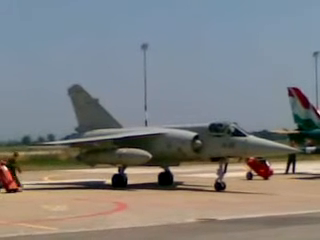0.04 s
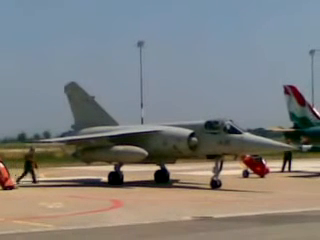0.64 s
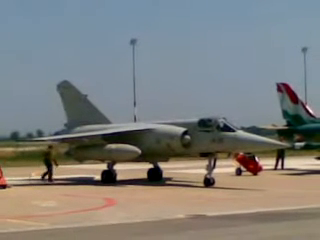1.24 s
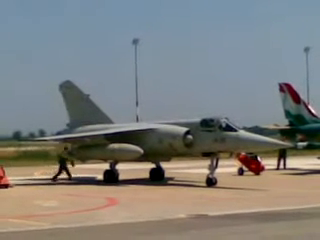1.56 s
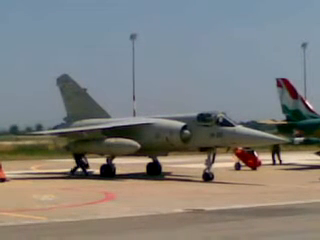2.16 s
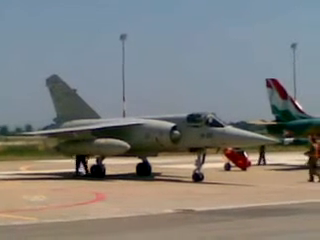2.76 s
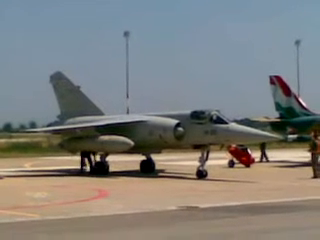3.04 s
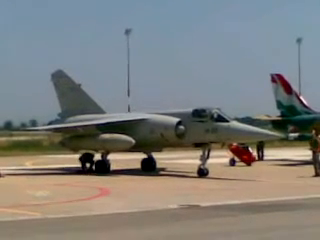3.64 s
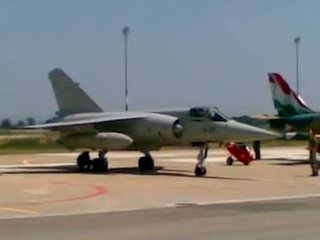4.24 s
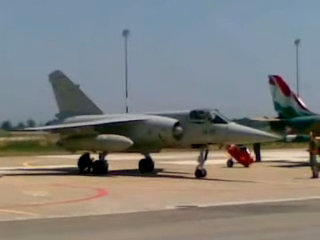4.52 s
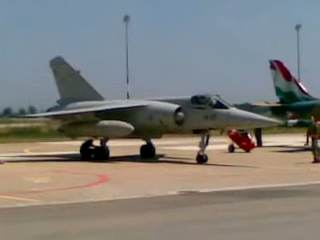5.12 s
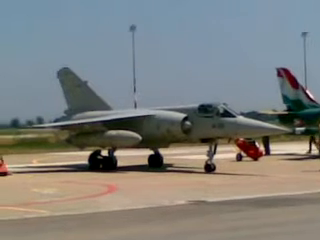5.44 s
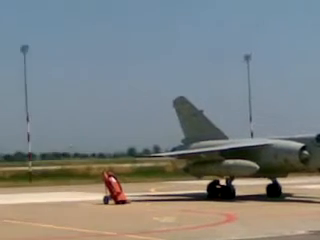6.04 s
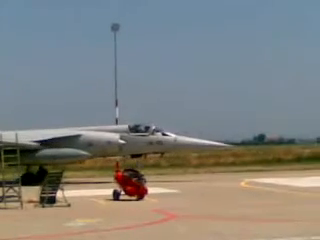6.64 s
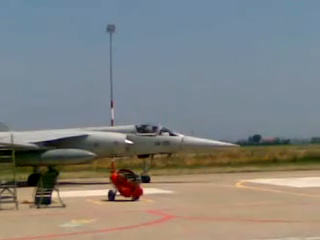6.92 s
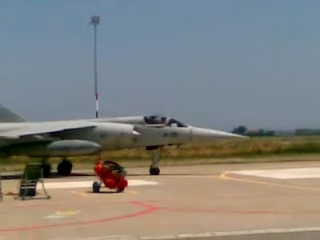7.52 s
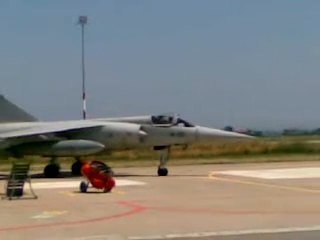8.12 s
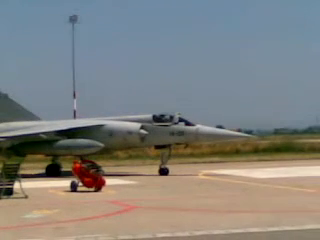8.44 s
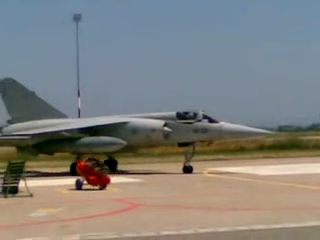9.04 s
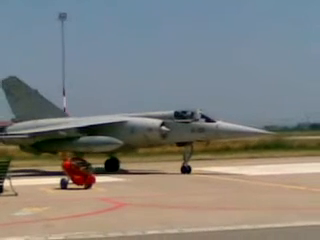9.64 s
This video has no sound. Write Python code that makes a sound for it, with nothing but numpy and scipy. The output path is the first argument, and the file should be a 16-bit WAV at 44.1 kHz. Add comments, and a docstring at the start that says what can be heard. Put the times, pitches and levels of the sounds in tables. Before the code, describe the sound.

A fighter jet's engine idles steadily outdoors on an airbase apron, some tens of metres from the microphone. Its piercing, many-toned whine wavers over intake rush, hiss and a billowing rumble. After about six seconds everything stops for a split second. The same noise resumes from another spot, now with a second jet whining slightly higher alongside, and runs to the end.

```python
"""Two turbojet fighters idle on an open apron, some tens of metres away, one spool a little faster.
Their compressors whine in thin blade tones standing on three humps of intake noise, over rushing air,
bright hiss and exhaust roar. Hot, moving air makes every part swell and fade. The sound stops for an
instant and resumes from a second standpoint, where the other jet's tones join the main jet's."""
import sys
import numpy as np
from scipy import signal
from scipy.fft import rfft, irfft, next_fast_len
from scipy.io import wavfile

SR = 44100
rng = np.random.default_rng(int(sys.argv[2]) if len(sys.argv) > 2 else 0)


def waveform_to_disk(signal):
    """Save audio, clipped to [-1, 1], as 16-bit WAV at the path in sys.argv[1]."""
    frames = np.transpose(np.atleast_2d(signal))
    scaled = np.clip(frames, -1, 1) * 32767
    samples = np.round(scaled).astype(np.int16)
    wavfile.write(sys.argv[1], SR, samples)


N = 435266
TIME = np.arange(N) / SR
FFT_SIZE = next_fast_len(N)
HZ = np.maximum(np.arange(FFT_SIZE // 2 + 1) * SR / FFT_SIZE, 1)


def from_db(db):
    """Decibels to gain."""
    return 10 ** (np.asarray(db) / 20)


def bell(middle_s, length_s):
    """A smooth rise to 1 and fall, above half for length_s."""
    return .5 + .5 * np.cos(np.pi * np.clip((TIME - middle_s) / length_s, -1, 1))


def drift(rate):
    """Smooth random modulation with spread 1, changing about rate times a second."""
    pole = np.exp(-80 * np.pi * rate / SR)  # one step every 40 samples
    steps = rng.standard_normal(N // 40 + 2002)
    slow = signal.lfilter([1], [1, -2 * pole, pole * pole], steps)[2000:]
    return np.interp(np.arange(N) / 40, np.arange(len(slow)), slow / slow.std())


def noise(density_db):
    """Noise with the given dB per Hz at every frequency."""
    white = rfft(rng.standard_normal(FFT_SIZE))
    return irfft(white * from_db(density_db), FFT_SIZE)[:N] * np.sqrt(SR / 2)


def noise_bed(spectrum, edge_db=36):
    """Noise shaped by an EQ curve, falling by edge_db an octave beyond its ends."""
    hz, db = np.transpose(spectrum)
    octaves_outside = np.abs(np.log2(HZ / np.clip(HZ, hz[0], hz[-1])))
    return noise(np.interp(np.log(HZ), np.log(hz), db) - edge_db * octaves_outside)


def two_band_gain(x, split_hz, below, above):
    """One gain below a crossover, another above it."""
    low = signal.sosfiltfilt(signal.butter(2, split_hz, fs=SR, output="sos"), x)
    return low * below + (x - low) * above


def moving_air(reach_octaves=0.12):
    """Hot, moving air tilts the spectrum and swells narrow bands. Returns air(hz), a gain over time."""
    # treble ride: t/s, level/dB
    treble = [(0.0, -0.5), (0.9, -0.7), (1.05, -2), (1.65, -1.5), (1.95, -0.6), (2.85, 0.5), (3.15, 1.5),
              (3.9, -1.3), (4.2, 1), (6.0, 0.6), (6.3, -2.1), (7.2, 0.7), (7.35, -0.16), (9.87, 0.6)]
    # as the treble rises the low whine recedes: f/Hz, level/dB per dB of treble
    tilt = [(1000, 0.5), (1800, -0.9), (2550, .35), (3600, 0.1), (5450, 1.3), (7500, 1.1), (11000, 1.4)]
    # one band briefly swells or fades: middle t/s, length/s, f/Hz, level/dB
    swells = [(0.2, .9, 1250, 2), (0.5, .9, 5500, -0.7), (0.6, 0.93, 3830, 4), (1.248, 0.13, 5500, 3.5),
              (1.552, .6, 2550, -2), (1.98, 0.29, 1790, 2), (3.0, 1.0, 3700, -1.8), (3.5, 0.53, 2530, -1),
              (3.65, 0.74, 1800, -2.2), (4.647, .45, 1820, 2.5), (5.3, 1.0, 1400, 0),
              (6.554, 1.4, 3650, -2), (6.9, 1.3, 5500, -0.5), (8.05, .4, 3600, 2), (8.2, 0.53, 5400, 2),
              (8.747, 0.18, 3800, 4), (8.8, 0.22, 2550, 2.5), (9.054, 0.24, 5500, -2), (9.3, .45, 1800, 1),
              (9.75, 0.2, 3620, 2.5), (9.8, 0.38, 1250, 4.5)]
    treble_db = np.interp(TIME, *np.transpose(treble))
    tilt_hz, follows = np.transpose(tilt)
    swell_hz = np.array([hz for _, _, hz, _ in swells])
    swell_db = np.array([db * bell(s, length) for s, length, _, db in swells])

    def air(hz):
        tilt_db = np.interp(np.log(hz), np.log(tilt_hz), follows) * treble_db
        nearness = np.exp(-(np.log2(hz / swell_hz) / reach_octaves) ** 2)
        return from_db(tilt_db + nearness @ swell_db)
    return air


def blade_tone(hz, spool_time):
    """A steady tone plus a part scattered by eddies; higher tones scatter more and flutter faster."""
    height = hz / 2000
    scattered = from_db(-6.5) * np.sqrt(height)
    flutter_rate = 3.04 * height
    phase = 2 * np.pi * (hz * spool_time + rng.random())
    in_phase = np.sqrt(2) + scattered * drift(flutter_rate)
    quadrature = scattered * drift(flutter_rate)
    return (in_phase * np.cos(phase) + quadrature * np.sin(phase)) / np.sqrt(1 + scattered ** 2)


def compressor_whine(tones, air, sag=0, wander_share=0.0002004, swell_depth=1.4):
    """Blade tones locked to one spool's wandering idle speed; they swell more deeply than the noise."""
    speed = 1 + wander_share * drift(.4) - sag
    spool_time = np.cumsum(speed) / SR
    return sum(gain * blade_tone(hz, spool_time) * air(hz) ** swell_depth for hz, gain in tones)


def main_jet_whine(first, second, air, sag_share=0.002786):
    """The main jet's compressor, heard from both standpoints; its spool speed sags once."""
    # blade tones: f/Hz, level/dB at the first standpoint, level/dB at the second
    blade_tones = [(1701, -39.3, -37.9), (1749, -44, -38.5), (1768, -31.9, -30.3), (1816, -45, -38.5),
                   (1863, -35.1, -31.2), (1978, -43.5, -45.2), (2007, -45.9, -43.9), (2098, -42.5, -46),
                   (2130, -44, -43.5), (2532, -39.3, -37.5), (3009, -45.0, -46.6), (3350, -41.0, -42.1),
                   (3520, -32.6, -34.7), (3679, -37.9, -40.8), (3726, -32.7, -32.5), (5305, -42.5, -45.1),
                   (5447, -27.9, -30.8), (5592, -35.8, -35.7)]
    tones = [(hz, first * from_db(db_1) + second * from_db(db_2)) for hz, db_1, db_2 in blade_tones]
    sag = sag_share * bell(middle_s=3.55, length_s=0.906)
    return from_db(0.5) * compressor_whine(tones, air, sag - sag.mean())


def intake_humps(standpoint, air, flicker_db=0.7):
    """Blades chop turbulent inflow into three humps of noise. Returns the sound and each one's air gain."""
    # humps at each standpoint: centre f/Hz, half-power width/Hz, level/dB per Hz
    humps_first = [(1687, 175, -52.5), (3490, 248, -48.5), (5510, 193, -47.5)]
    humps_second = [(1800, 194, -53.5), (3600, 213, -47), (5540, 175, -47)]
    sound, gains = 0, []
    for hz, width, db in (humps_first, humps_second)[standpoint]:
        shape_db = db - 20 * np.log10(2) * abs(HZ - hz) / width
        gain = air(hz)
        sound += noise(shape_db) * gain * from_db(flicker_db * drift(10))
        gains.append(gain)
    return sound, gains


def intake_rush(standpoint, air, hump_gains):
    """Air rushes into the intakes, swelling along with the humps and hiss around it."""
    # rush spectrum at each standpoint: f/Hz, level/dB per Hz
    rush_first = [(1000, -67.5), (1500, -62.5), (2330, -57), (2450, -64.5), (2650, -60), (3200, -62),
                  (4400, -65), (4700, -59), (6200, -60)]
    rush_second = [(1000, -64.5), (1500, -56), (2250, -55.0), (2430, -61.5), (2750, -62.5), (3200, -58),
                   (4400, -59.0), (5000, -57.5), (6300, -58.5)]
    low, middle, high = hump_gains
    body_gain = np.cbrt(low * middle * high)
    edge_gain = np.cbrt(middle * high * air(7500))
    rush = noise_bed((rush_first, rush_second)[standpoint])
    rush = two_band_gain(rush, split_hz=4400, below=body_gain, above=edge_gain)
    return two_band_gain(rush, split_hz=1480, below=air(1250), above=1)


def compressor_hiss(standpoint, air):
    """The later compressor stages add a bright hiss on top."""
    # hiss spectrum at each standpoint: f/Hz, level/dB per Hz
    hiss_first = [(6200, -60.5), (6750, -62), (7400, -55), (8950, -57), (9650, -67.5), (10950, -67),
                  (12100, -84), (13100, -77), (15000, -110.6)]
    hiss_second = [(6300, -68), (6750, -55.5), (7350, -50.5), (7900, -58), (9000, -57.5), (10900, -69.5),
                   (11900, -76.5), (13000, -80.8), (15000, -100)]
    hiss = noise_bed((hiss_first, hiss_second)[standpoint])
    return two_band_gain(hiss, split_hz=9500, below=air(7500), above=air(11000))


def exhaust_roar(standpoint, rest_db=-0.9, billow_db=1.0):
    """Mixing noise of the hot jet; its largest eddies make the bass billow and heave."""
    # roar at each standpoint, notched where the echo off the concrete cancels it: f/Hz, level/dB per Hz
    roar_first = [(20, -61), (36, -50.5), (100, -50.5), (132, -54), (148, -49), (178, -50.5), (205, -52.5),
                  (270, -53.5), (330, -60), (510, -60), (650, -58), (800, -62), (1070, -64.5),
                  (1400, -68.5)]
    roar_second = [(20, -61), (36, -50.5), (90, -56.5), (133, -54.5), (152, -51), (178, -49.5), (210, -54),
                   (270, -56.5), (385, -62.5), (520, -57.5), (670, -58.1), (760, -65.5), (830, -61.5),
                   (1400, -69)]
    # ride of the roar above the bass: t/s, level/dB
    roar_ride = [(0.0, -0.3), (4.05, 1.1), (5.55, -1.5), (6.3, 1), (8.7, 0.1), (8.85, -2.5), (9.87, -0.3)]
    # the rumble heaves or lulls about its resting level: middle t/s, length/s, level/dB
    heaves = [(0.5, .8, 1.8), (2.52, 0.14, 4), (3.1, 0.52, -0.7), (4.1, .45, 1.5), (5.4, 0.39, 2.5),
              (6.55, 1, 2), (7.95, .25, 2), (8.45, 0.28, -2.5), (8.77, 0.25, 4)]
    roar_db = np.interp(TIME, *np.transpose(roar_ride))
    heave_db = sum(db * bell(s, length) for s, length, db in heaves)
    rumble_db = rest_db + heave_db + billow_db * drift(9.1)
    roar = noise_bed((roar_first, roar_second)[standpoint])
    return two_band_gain(roar, split_hz=300, below=from_db(rumble_db), above=from_db(roar_db))


def other_jet_whine(air):
    """The other jet's spool turns a little faster, so its blade tones sit slightly sharp."""
    # blade tones: f/Hz, level/dB
    blade_tones = [(1793, -37), (1890, -33.8), (2566, -38.3), (3052, -44.6), (3567, -35.3), (3779, -32.0),
                   (5526, -31.7)]
    return from_db(0.4) * compressor_whine([(hz, from_db(db)) for hz, db in blade_tones], air)


def scene(stop_s=5.883, resume_s=6.043, shimmer_db=0.53):
    """The first standpoint dies away quickly; after a short silence the second cuts in."""
    first = np.interp(TIME - stop_s, [0, .001, .023], [1, .17, 0])
    second = np.interp(TIME - resume_s, [-.001, .001], [0, 1])
    shimmer = from_db(shimmer_db * drift(9))  # hot air shakes the treble
    air = moving_air()
    mix = shimmer * (main_jet_whine(first, second, air) + second * other_jet_whine(air))
    for standpoint, fader in enumerate([first, second]):
        humps, hump_gains = intake_humps(standpoint, air)
        rush = intake_rush(standpoint, air, hump_gains)
        hiss = compressor_hiss(standpoint, air)
        mix += fader * (rush + shimmer * (humps + hiss) + exhaust_roar(standpoint))
    return np.tile(mix, (2, 1))


def record(dry, ceiling=.9, cutoff_hz=15500):
    """Clips the rarest peaks and cuts the top with a steep low-pass."""
    lowpass = signal.ellip(10, .1, 80, cutoff_hz, fs=SR, output="sos")
    return signal.sosfilt(lowpass, np.clip(dry, -ceiling, ceiling))


dry = scene()
out = record(dry)
waveform_to_disk(out)
```